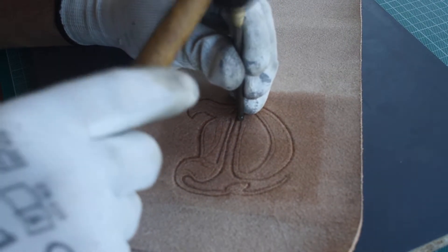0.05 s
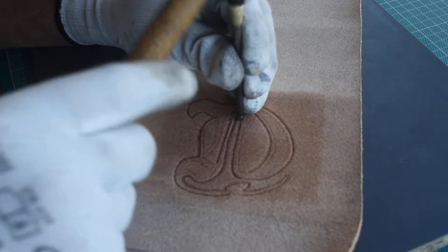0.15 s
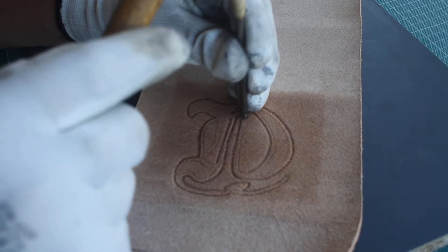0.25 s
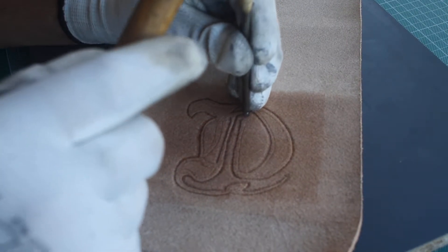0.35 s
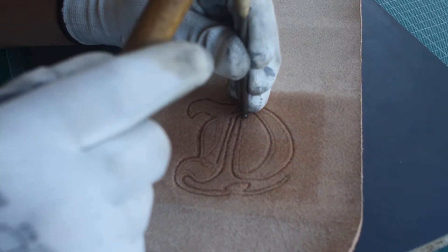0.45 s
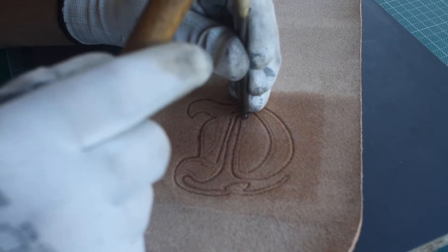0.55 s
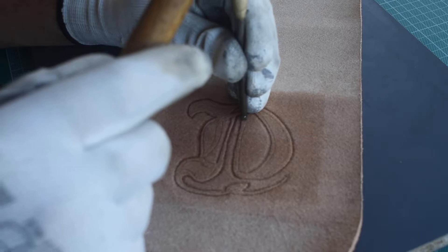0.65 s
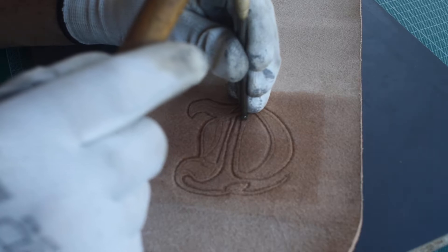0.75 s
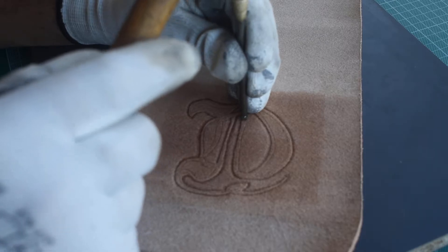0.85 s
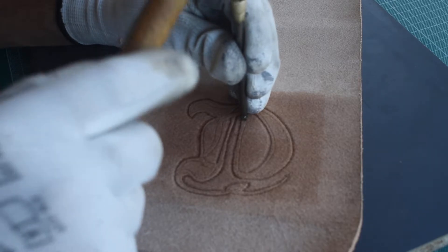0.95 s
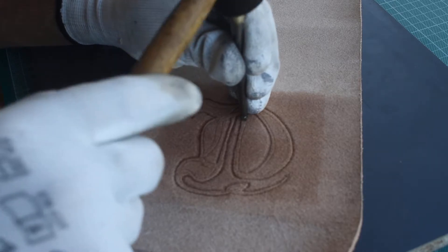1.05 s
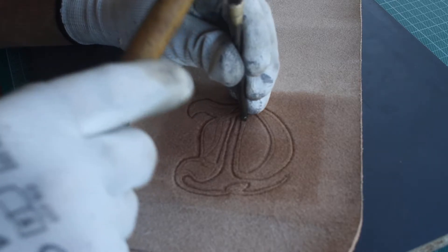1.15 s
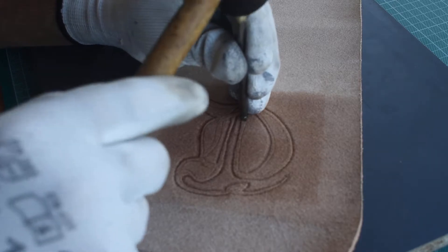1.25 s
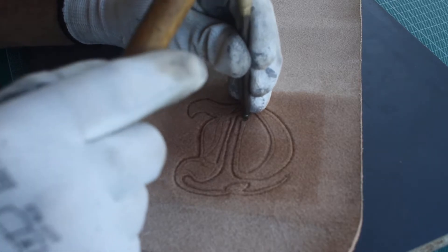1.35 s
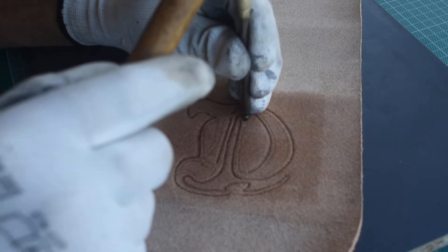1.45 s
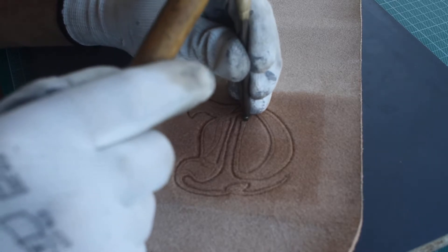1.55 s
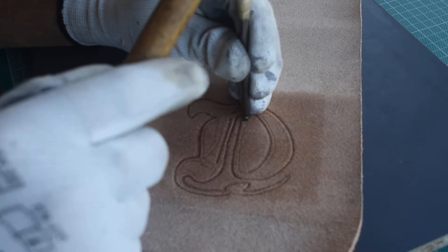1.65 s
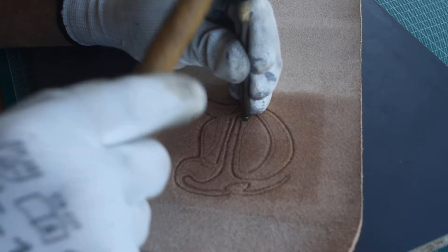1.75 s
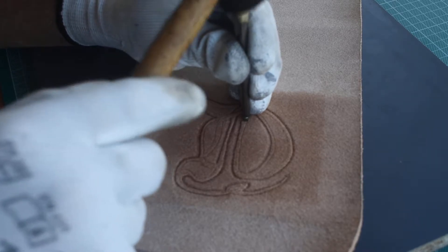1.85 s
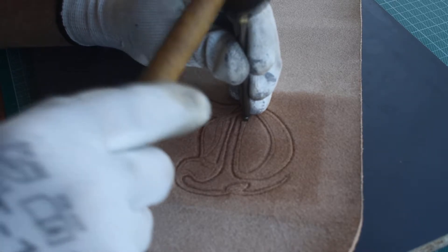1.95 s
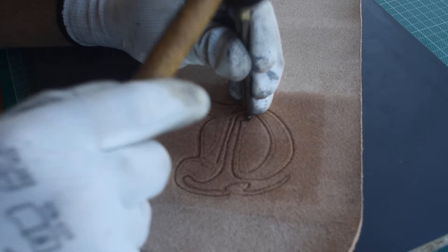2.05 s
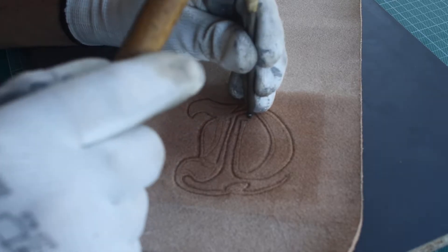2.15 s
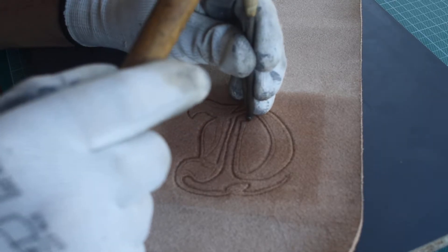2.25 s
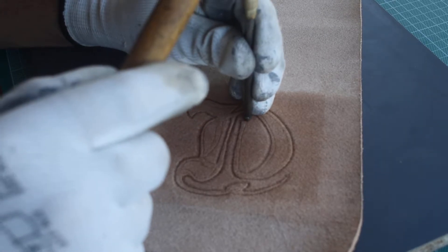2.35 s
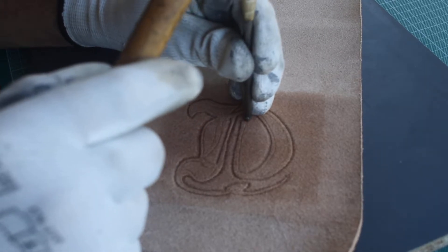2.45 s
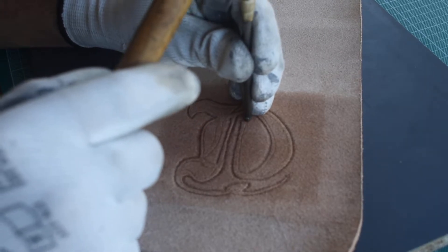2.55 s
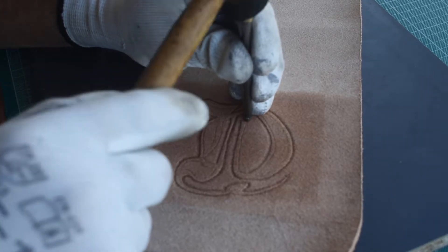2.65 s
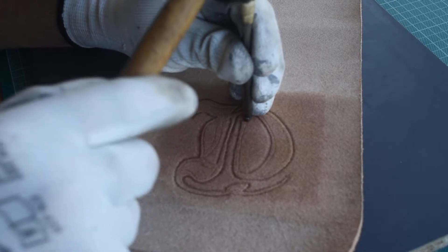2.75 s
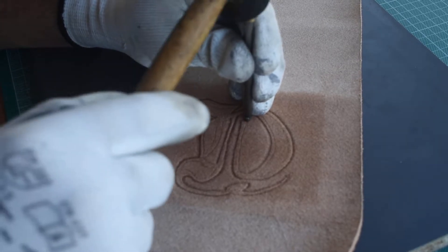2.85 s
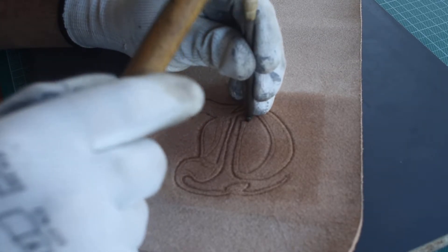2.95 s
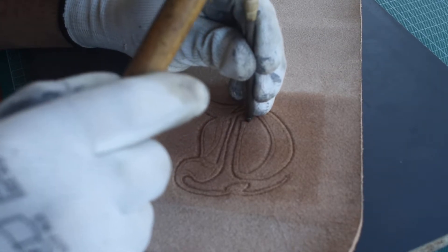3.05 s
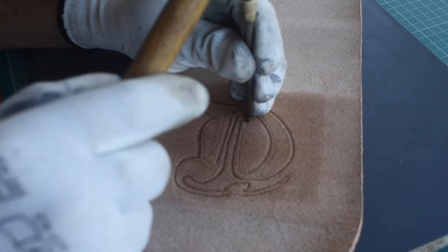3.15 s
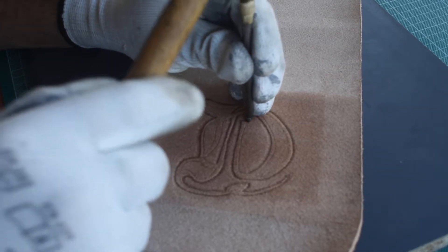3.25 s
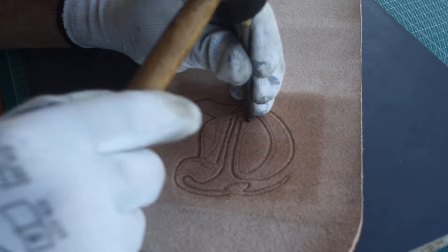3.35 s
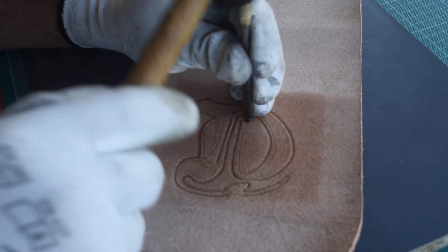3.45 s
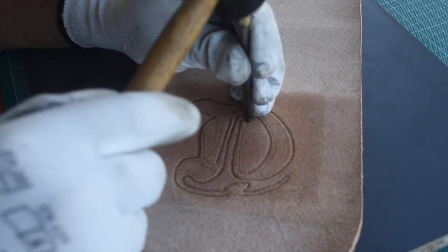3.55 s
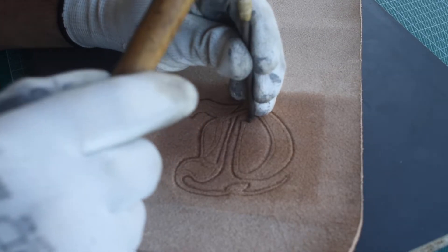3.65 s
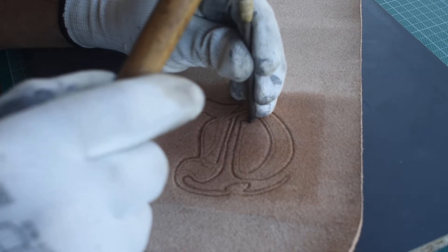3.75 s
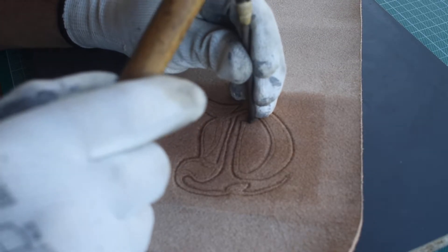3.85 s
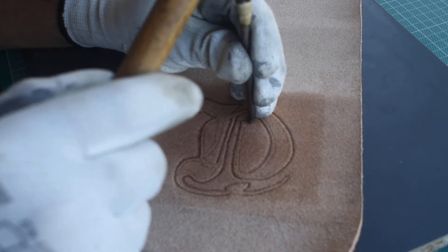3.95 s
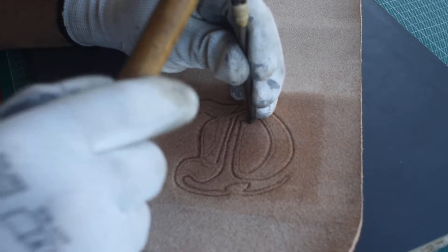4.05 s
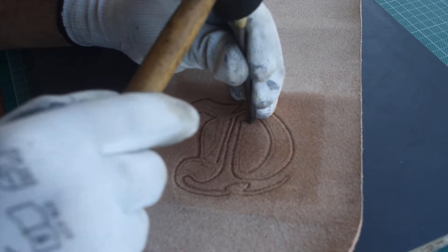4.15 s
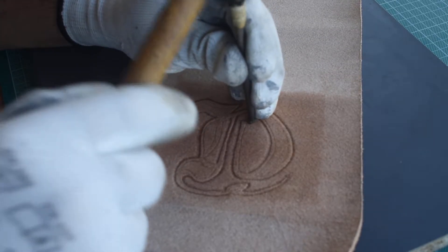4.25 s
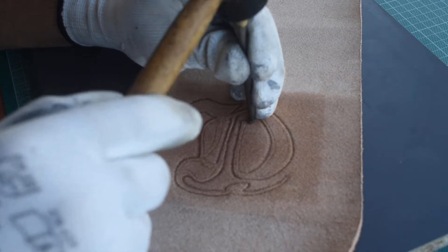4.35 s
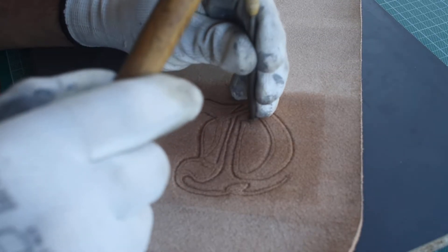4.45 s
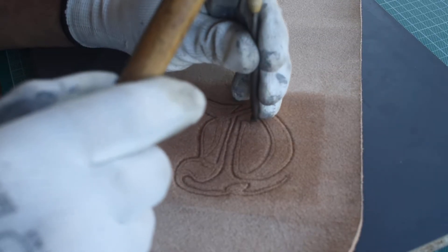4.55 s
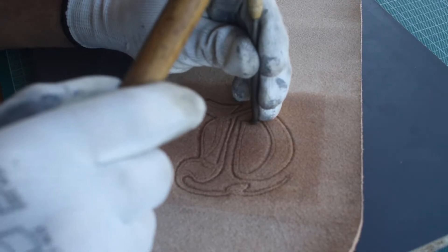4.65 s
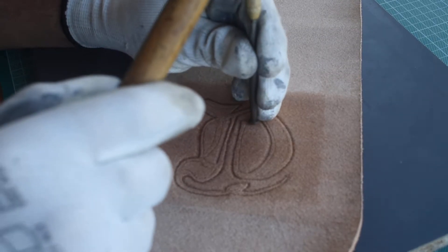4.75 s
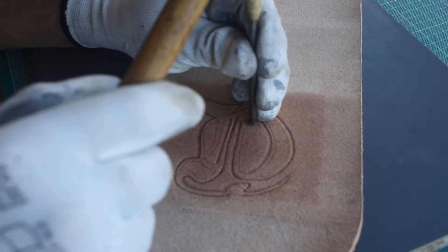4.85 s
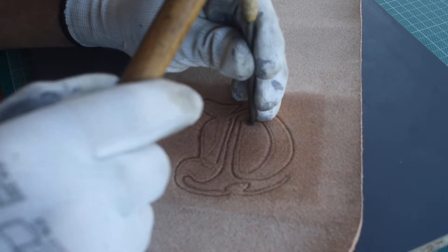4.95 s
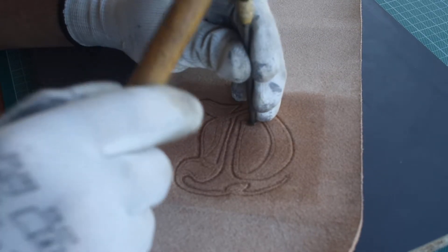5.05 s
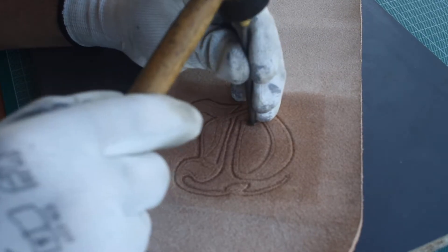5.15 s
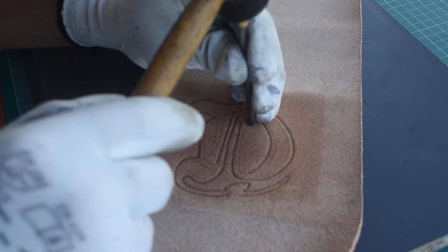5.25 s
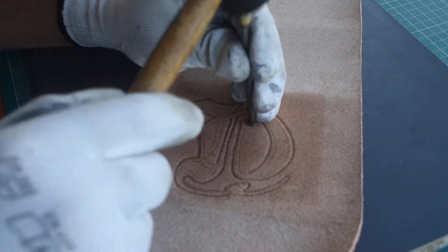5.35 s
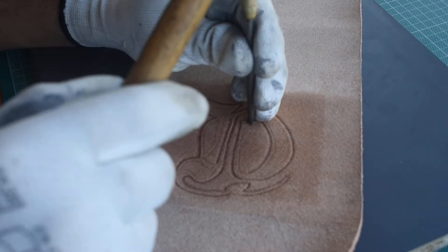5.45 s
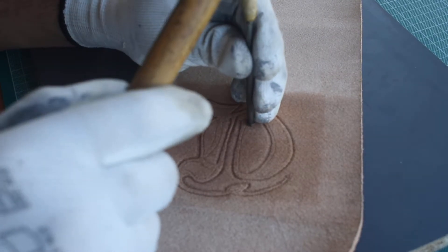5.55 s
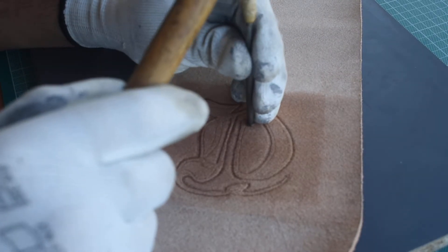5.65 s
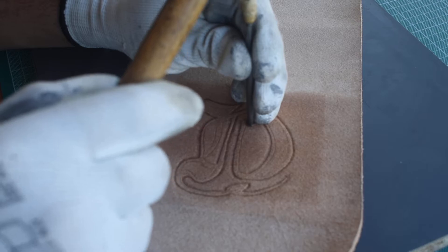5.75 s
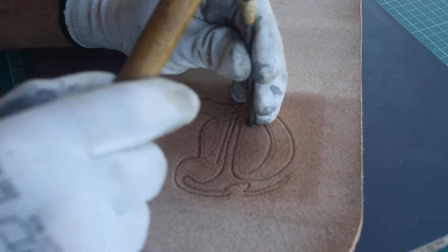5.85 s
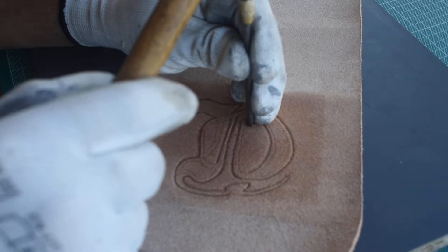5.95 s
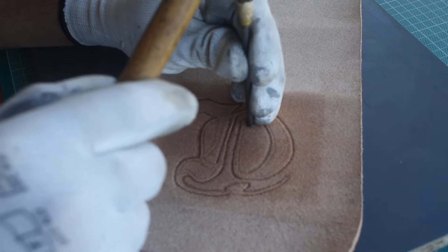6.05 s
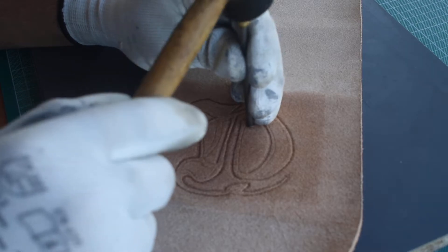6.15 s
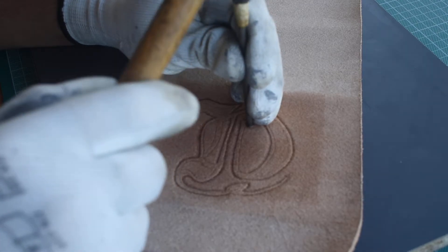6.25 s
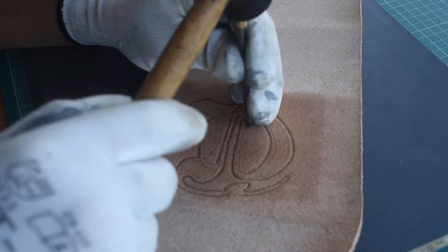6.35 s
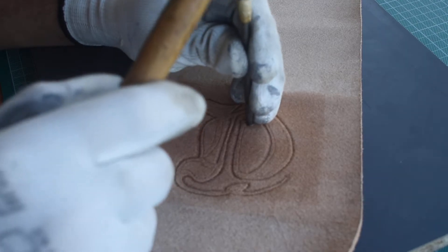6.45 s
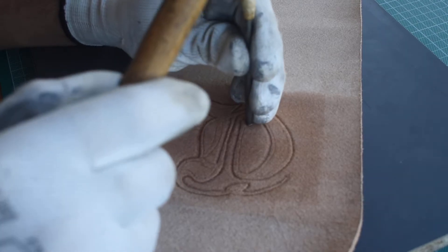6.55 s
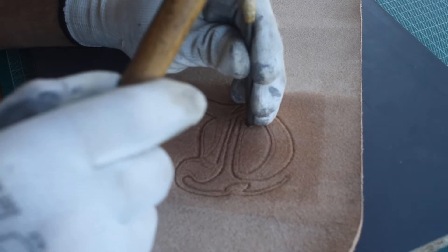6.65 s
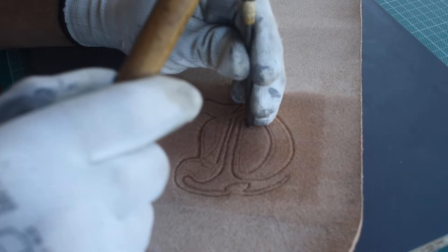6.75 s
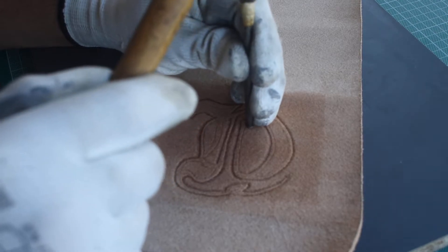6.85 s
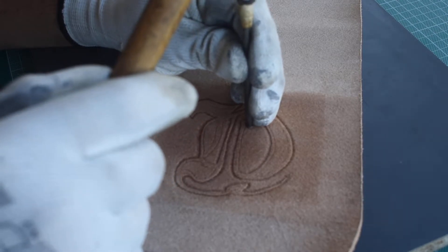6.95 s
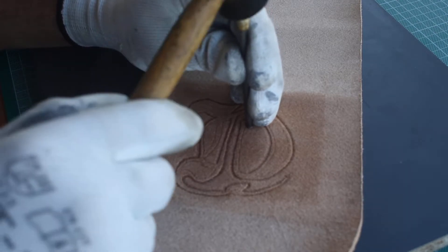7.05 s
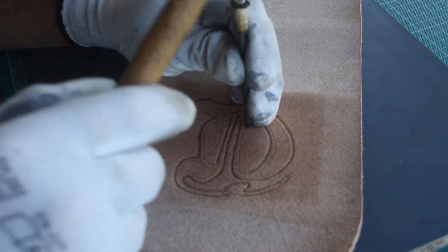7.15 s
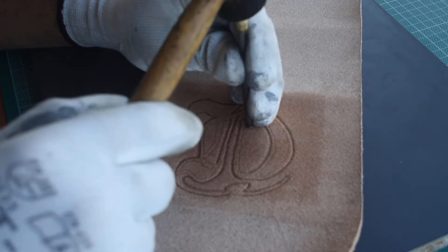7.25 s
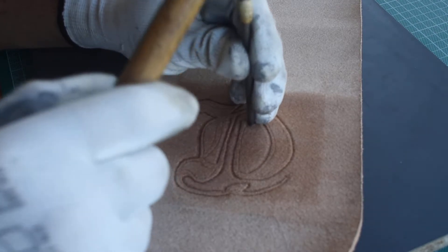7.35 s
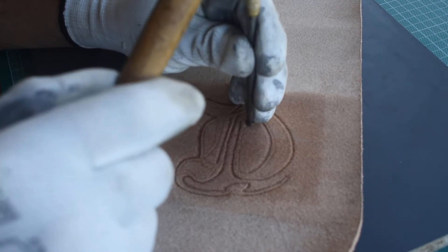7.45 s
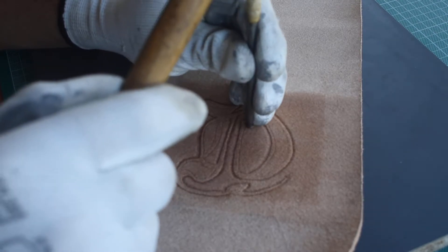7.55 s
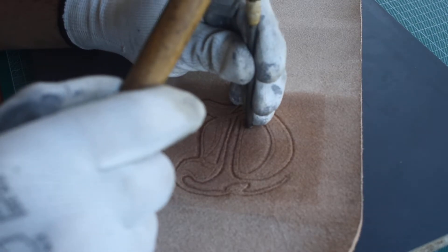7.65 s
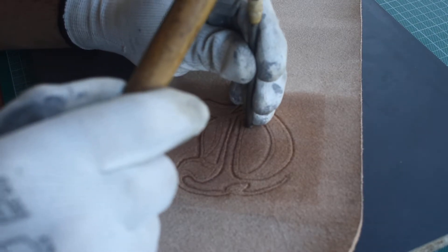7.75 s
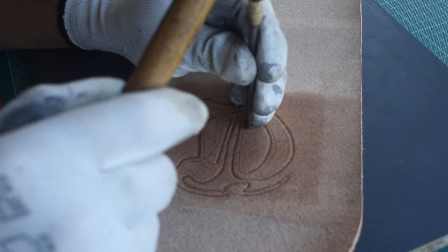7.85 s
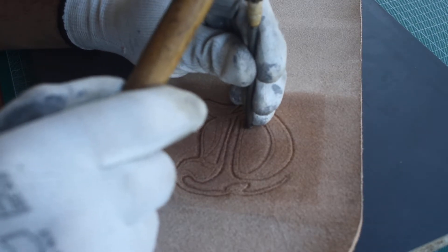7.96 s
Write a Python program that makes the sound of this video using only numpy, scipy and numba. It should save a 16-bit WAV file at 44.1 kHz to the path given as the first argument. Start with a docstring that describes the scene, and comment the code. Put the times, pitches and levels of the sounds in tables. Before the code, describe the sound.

In a small workroom, a mallet taps a hand-held steel stamp into damp leather on a bench, very close to a camera microphone. A single knock lands at 0.1 s, then pairs about 0.2 s apart begin near 1.0, 1.8, 2.65, 3.3, 4.1, 5.1, 6.1 and 7.1 s. Each is a dry, hard mid-pitched clack with a bright metallic tick and tiny rattle at its front, followed by close wall echoes and a short hollow ring of room and furniture; the first of the 6.1 s pair is softer. The level dips briefly after each blow. Between them, faint sparrows outside give short, buzzy falling chirps throughout, over quiet distant traffic and soft hiss, the traffic swelling slightly after 5 s. A very faint, thin high bird whistle wavers around 6.4-6.8 s, and a soft low bump comes at 7.9 s.

```python
"""A mallet taps a steel stamp into damp leather on a bench, in quick pairs, close to a camera microphone.
Each blow is a short force pulse exciting decaying modes of slab and bench, led by a steel tick and rattle.
A small room answers with echoes, a noise tail and slow resonances; distant traffic and hiss are shaped noise.
Sparrows chirp outside as warbled falling tones; a thin bird whistle and a soft low bump come late.
The camera's gain control ducks just after loud peaks, and peaks beyond full scale clip."""
import sys
import numpy as np
from scipy import signal
from scipy.fft import rfft, irfft
from scipy.io import wavfile
from scipy.ndimage import uniform_filter1d
from numba import njit

SR = 44100
rng = np.random.default_rng(int(sys.argv[2]) if len(sys.argv) > 2 else 0)


def boost_factor(decibels):
    """Convert a level in decibels to a linear amplitude factor."""
    exponent = np.asarray(decibels, float) / 20
    return 10 ** exponent


def generate_wav(sig):
    """Save sig (samples, or channels by samples) to the path in sys.argv[1] as 16-bit PCM at SR."""
    pcm = np.round(np.clip(np.atleast_2d(sig).T, -1, 1) * 32767).astype(np.int16)
    wavfile.write(sys.argv[1], SR, pcm)


N = 352800  # samples


def ring(modes, seconds, phase=0):
    """Modal synthesis: a struck body sounds as a sum of exponentially decaying cosines."""
    t = np.arange(int(seconds * SR)) / SR
    hz, db, t60 = np.transpose(modes)[:, :, None]
    decay = np.exp(-np.log(1000) * t / t60)
    return (boost_factor(db) * decay * np.cos(2 * np.pi * hz * t + phase)).sum(0)


def colour(x, points):
    """Linear filtering: multiply the spectrum by a gain drawn through (Hz, dB) points on a log axis."""
    hz, db = np.transpose(points)
    f = np.maximum(np.fft.rfftfreq(len(x), 1 / SR), 1)
    return irfft(rfft(x) * boost_factor(np.interp(np.log(f), np.log(hz), db)), len(x))


def unit(x):
    """Power normalization: scale to rms 1."""
    return x / np.sqrt(np.mean(x ** 2))


def add(out, x, s):
    """Superposition: mix x into out at time s in seconds."""
    i = int(s * SR)
    out[i:i + len(x)] += x[:N - i]


def tail(bands, rise_s, seconds=.6):
    """Diffuse reverberation: each noise band decays at its own rate, under one common quick rise."""
    t = np.arange(int(seconds * SR)) / SR
    out = 0
    for hz, db, t60 in bands:
        skirts = [(hz / 2.2, -40), (hz / 1.4, 0), (hz * 1.4, 0), (hz * 2.2, -40)]
        band = unit(colour(rng.standard_normal(len(t)), skirts))
        out = out + boost_factor(db) * band * np.exp(-np.log(1000) * t / t60)
    return out * (1 - np.exp(-(t / rise_s) ** 2)) / np.sqrt(len(bands))


# Traffic level over time. Each row: time in seconds, level in dB.
TRAFFIC_LEVEL = [(0, -55), (.5, -57.5), (1.5, -57), (2.4, -57.5), (3.2, -57), (3.9, -57.5), (4.6, -56.5),
                 (5.6, -54.5), (6.6, -55.5), (7.5, -54.5), (8, -53)]
# Traffic spectrum. Each row: frequency in Hz, relative density in dB per Hz.
ROAD_SPECTRUM = [(12, -40), (20, -5), (27, -7.5), (173, -1), (416, -4), (480, -4), (736, -6), (1020, -4.5),
                 (1440, -8), (1770, -8.5), (2600, -12), (3380, -52), (5720, -120)]
# Spectrum of a far flock and microphone hiss. Each row: frequency in Hz, relative density in dB per Hz.
HISS_SPECTRUM = [(1530, -28), (2600, -18), (2770, 0), (3770, 1.5), (4720, -2), (5090, -4), (6420, -7.5),
                 (14800, -20.5), (16000, -15), (16500, -44.5)]
HISS_DB = -62


def outdoors():
    """Stationary and modulated noise: low and middle traffic noise swells beneath a steady hiss."""
    swell = boost_factor(np.interp(np.arange(N) / SR, *np.transpose(TRAFFIC_LEVEL)))
    road = unit(colour(rng.standard_normal(N), ROAD_SPECTRUM))
    hiss = unit(colour(rng.standard_normal(N), HISS_SPECTRUM))
    return road * swell + hiss * boost_factor(HISS_DB)


# Mallet blows. Each row: time in seconds, knock in relative dB, tick in relative dB, contact in ms,
# low hum in relative dB.
BLOWS = [(0.0984, 1, -13, 0.98, -1), (1.0183, 0.9, -9.5, 0.89, 2), (1.201, 1.8, -12, 0.9, 3),
         (1.7868, 0.5, -11, 0.84, 1.7), (1.9759, 3, -8.5, 0.83, 1), (2.6545, 2, -10.5, 0.78, -2.2),
         (2.8436, 1.1, -12.5, 0.8, 0.5), (3.3082, 1.6, -9, 0.77, 6), (3.4917, 2.1, -12.5, 0.81, 4.5),
         (4.1136, 1.7, -8, 0.84, -1.5), (4.2986, 3.5, -11.5, 0.79, 0.7), (5.1045, 1, -10, 0.89, 3.5),
         (5.2744, 1.9, -11.5, 0.84, -1.5), (6.1356, -2, -12.5, 0.83, -0.5), (6.328, 2.05, -12, 0.93, -1),
         (7.0679, 2.5, -11.5, 0.79, 1), (7.2495, 3, -11.5, 0.83, 3.5)]
# Modes of slab and bench under the leather. Each row: frequency in Hz, relative level in dB, t60 in seconds.
SLAB_MODES = [(397, -17.5, 0.026), (559, -6, 0.012), (862, -5, 0.018), (1425, 2.5, 0.011),
              (2054, -4, 0.012), (2980, -66, .01)]
# Typical modes of the hand-held steel stamp. Each row: frequency in Hz, relative level in dB, t60 in seconds.
STAMP_MODES = [(3100, -10.5, 0.0051), (4000, -36, 0.18), (4400, -16.5, 0.0011), (5170, -15.5, 0.0029),
               (7180, 7.5, 0.0033), (8360, 2, 0.007)]
# Spectrum of the stamp's rattle. Each row: frequency in Hz, relative level in dB.
RATTLE_SPECTRUM = [(1500, -21), (2600, 4), (5000, 1), (7500, -18.5), (10000, -15.5), (16000, -40)]
RATTLE_DB, RATTLE_T60_S = -16.5, 0.019  # level relative to the tick setting
SLAB_TO_ROOM_DB, CLICK_TO_ROOM_DB = 25.5, 13.5
PAIR_GAP_S = .3  # a blow this soon after another is the second of a pair
FIRST_UPPER_DB, SECOND_UPPER_DB = 3, 1.4  # slab modes above 1800 Hz: the second blow is duller


def mallet():
    """Impact excitation: steel ticks and rattles lead, then a contact pulse drives all slab modes together."""
    knocks, ticks, pushes, shoves = np.zeros((4, N))
    chance = rng.standard_normal((len(BLOWS), len(STAMP_MODES) + len(SLAB_MODES)))
    rattles = rng.standard_normal((len(BLOWS), 2048))
    fade = np.exp(-np.log(1000) * np.arange(rattles.shape[1]) / SR / RATTLE_T60_S)
    second = np.diff(np.array(BLOWS)[:, 0], prepend=-1) < PAIR_GAP_S
    for (s, knock_db, tick_db, ms, hum_db), late, c, rattle in zip(BLOWS, second, chance, rattles):
        upper_db = SECOND_UPPER_DB if late else FIRST_UPPER_DB
        pulse = np.hanning(int(ms * SR / 1000) + 2) ** 1.543  # bell-shaped contact force
        pulse /= pulse.sum()
        push = pulse * boost_factor(knock_db)
        shove = pulse * boost_factor(hum_db)
        # every blow lands a little differently
        slab = [(hz, db + .3 * d + upper_db * (hz > 1800), t60)
                for (hz, db, t60), d in zip(SLAB_MODES, c[len(STAMP_MODES):])]
        stamp = [(hz * (1 + .03 * d), db + 2 * d, t60) for (hz, db, t60), d in zip(STAMP_MODES, c)]
        start = s - ms / 2000  # the pulse is centred on the blow
        add(knocks, np.convolve(push, ring(slab, .06)), start)
        tick = -boost_factor(tick_db - 22.5) * np.convolve(np.hanning(8), ring(stamp, .12))
        add(ticks, tick, s - .00075)
        rattle = unit(colour(rattle, RATTLE_SPECTRUM)) * fade
        add(ticks, boost_factor(tick_db + RATTLE_DB) * rattle, s - .0006)
        add(pushes, boost_factor(SLAB_TO_ROOM_DB) * push, start)
        click = boost_factor(np.array([tick_db + CLICK_TO_ROOM_DB]))  # the room hears the tick as a plain click
        add(pushes, click, start)
        add(shoves, shove, start)
    return knocks, ticks, pushes, shoves


# Room and furniture resonances that build up after a blow. Each row: frequency in Hz, relative level in dB,
# t60 in seconds.
RESONANCES = [(84.4, -27, 0.58), (179.9, -13.5, 0.26), (200.5, -6.5, 0.19), (297.9, 1, 0.24),
              (305.4, 8.5, 0.18), (349.6, -8.5, 0.31), (400, -10, 0.21), (406, 0.5, 0.25),
              (427.4, 2.5, 0.17), (482, -2, 0.14), (512.7, -6, 0.24), (561, -17, 0.15), (579.4, -1.5, 0.17),
              (664, -8.5, 0.27), (682.7, -11.5, 0.37), (733, -10, 0.22), (787, -10, 0.19), (900, -27, 0.13),
              (895, -6, 0.21), (918, -4, 0.24), (981, 27.5, 0.073), (1036, -19, 0.31), (1050, -23, 0.071),
              (1174, -2, 0.19), (1227, 1, 0.15), (1296.1, -5, 0.23), (1370, -1.5, 0.21), (1430, -27, 0.14)]
# Wall echoes. Each row: delay in seconds, level in dB, sign without unit.
ECHOES = [(.0151, -10, -1), (0.021, -17, -1), (0.0256, -24.5, 1), (.0335, -25.5, 1)]
# Diffuse tail. Each row: band centre in Hz, relative level in dB, t60 in seconds.
TAIL_BANDS = [(153, -54, 0.17), (278, -49, 0.21), (660, -41, 0.27), (1116, -37.5, 0.24), (1960, -34, 0.18),
              (3000, -34.5, 0.24), (4500, -36.5, 0.2), (6600, -44, 0.13), (10000, -66, .12),
              (15000, -67, .08)]
TAIL_RISE_S = 0.0038
RESONANCE_DB = -23
HUM_TOP_HZ = 325  # below, each blow's hum level drives the resonances; above, its knock and tick
HUM_RISE_S, BODY_RISE_S = 0.036, 0.026  # the upper resonances build faster


def room(knocks, pushes, shoves):
    """Convolution with impulse responses: wall echoes, a diffuse tail, slow modes of room and furniture."""
    diffuse = tail(TAIL_BANDS, TAIL_RISE_S)
    echoes = np.zeros(SR // 20)
    for s, db, sign in ECHOES:
        echoes[int(s * SR)] = np.sign(sign) * boost_factor(db)
    # walls return mostly the middle range
    dull = colour(knocks, [(500, -7.5), (900, 3.5), (1300, 1), (2500, -14.0)])
    low = [mode for mode in RESONANCES if mode[0] < HUM_TOP_HZ]
    high = [mode for mode in RESONANCES if mode[0] >= HUM_TOP_HZ]
    # neighbours start in opposite directions, close pairs beat
    hum = ring(low, .6, np.pi * (np.arange(len(low))[:, None] + .5))
    body = ring(high, .6, np.pi * (np.arange(len(high))[:, None] + .5 + len(low)))
    t = np.arange(len(hum)) / SR
    hum = hum * boost_factor(RESONANCE_DB) * (1 - np.exp(-(t / HUM_RISE_S) ** 2))
    # pushes already carry the slab-to-room gain
    body = body * boost_factor(RESONANCE_DB - SLAB_TO_ROOM_DB) * (1 - np.exp(-(t / BODY_RISE_S) ** 2))
    paths = [(pushes, diffuse + body), (dull, echoes), (shoves, hum)]
    return sum(signal.oaconvolve(source, response)[:N] for source, response in paths)


# Sparrow notes. Each row: start in seconds, length in seconds, first pitch in Hz, last pitch in Hz,
# relative level in dB.
CHIRPS = [(.184, 0.039, 5370, 5270, -55.5), (0.219, 0.053, 4400, 3740, -63), (.282, 0.1, 4000, 3800, -61.5),
          (0.284, 0.12, 5880, 5453, -63.5), (0.318, .11, 4590, 4120, -54.5),
          (0.349, 0.14, 3245, 2875, -59.5), (.61, 0.12, 5260, 3175, -58), (1.091, .13, 4860, 4170, -56.5),
          (1.106, 0.16, 3960, 3195, -58.5), (1.205, .057, 5100, 4880, -55), (1.256, 0.075, 6600, 6400, -67),
          (1.266, 0.075, 4970, 4640, -58), (1.294, 0.11, 4200, 3100, -56), (1.568, 0.11, 5260, 3254, -56),
          (2.025, 0.062, 4500, 4095, -52.5), (2.036, .14, 3520, 2830, -58), (2.202, 0.057, 4640, 4680, -66),
          (2.27, 0.075, 5290, 4830, -63), (2.309, .076, 4260, 3800, -61.5), (2.715, .12, 4360, 2960, -57.5),
          (2.72, .08, 5700, 5370, -65), (3.005, 0.096, 5425, 3350, -53.5), (3.927, 0.19, 4850, 3970, -58),
          (3.965, 0.13, 3900, 3210, -54.5), (4.735, 0.15, 5990, 3200, -53.5),
          (4.967, 0.045, 5830, 5570, -60.5), (5.013, 0.086, 5100, 4400, -58),
          (5.02, 0.076, 3390, 2950, -58), (5.94, .145, 5720, 3030, -57), (6.061, 0.17, 4600, 3800, -62),
          (6.35, 0.095, 4000, 3000, -55.5), (6.57, 0.071, 4000, 3690, -61),
          (6.791, 0.23, 5800, 5540, -64.5), (6.82, 0.19, 4320, 3885, -58.5), (6.86, .2, 3210, 3100, -60),
          (7.46, 0.16, 4500, 4300, -56.5), (7.482, .19, 3500, 3000, -58.5), (7.9, .1, 4900, 3100, -55)]
# warble rate: a floor plus a share of the last pitch, capped
WARBLE_FLOOR_HZ, WARBLE_SHARE, WARBLE_MAX_HZ = 39.4, .095, 443
FLAT_DEPTH_RAD, DEPTH_LOSS_RAD_PER_OCT = 1.01, 0.45  # level notes buzz more than steep falls
FALL_POWER, PEAK_SKEW, EDGE_POWER = 2.7, 0.81, 0.5  # bend of the fall; early peak; softness of both ends
RASP_RAD, PATCHY_DB = 0.77, 4  # rms hoarseness; rms unevenness within a note


def sparrows():
    """Phase modulation: a fast warble spreads gliding tones into stacks of lines, and walls reflect them."""
    out = np.zeros(N)
    rasp = RASP_RAD * unit(uniform_filter1d(rng.standard_normal(N), size=60))
    for s, length, first_hz, last_hz, db in CHIRPS:
        u = np.linspace(0, 1, int(length * SR))  # progress through the note
        hz = last_hz + (first_hz - last_hz) * (1 - u) ** FALL_POWER
        warble_hz = min(WARBLE_FLOOR_HZ + WARBLE_SHARE * last_hz, WARBLE_MAX_HZ)
        depth = FLAT_DEPTH_RAD - DEPTH_LOSS_RAD_PER_OCT * np.log2(first_hz / last_hz)
        phase = 2 * np.pi * np.cumsum(hz) / SR
        phase += depth * np.sin(2 * np.pi * warble_hz * length * u)
        i = int(s * SR)
        phase += rasp[i:][np.minimum(np.arange(len(u)), N - i - 1)]
        voice = np.sin(phase) + .025 * np.sin(2 * phase)
        envelope = np.abs(np.sin(np.pi * u ** PEAK_SKEW)) ** EDGE_POWER
        add(out, boost_factor(db) * envelope * voice, s)
    out *= boost_factor(PATCHY_DB * unit(uniform_filter1d(rng.standard_normal(N), size=500)))
    yard = tail([(3000, -26.5, 0.19), (5400, -27.5, 0.19), (3800, -36.0, 0.79)], 0.0032)
    yard[0] = 1.0  # direct sound
    return signal.fftconvolve(out, yard)[:N]


def whistle():
    """Frequency modulation: another bird's thin high tone wavers slowly in pitch."""
    t = np.arange(int(.4 * SR)) / SR
    hz = 6100 - 70 * np.sin(2 * np.pi * t / .21)  # 70 Hz swing, .21 s period
    tone = np.sin(2 * np.pi * np.cumsum(hz) / SR)
    out = np.zeros(N)
    add(out, boost_factor(-72) * signal.windows.tukey(len(t), .2) * tone, 6.41)
    return out


# A soft low bump. The row: start in seconds, frequency in Hz, level in dB, t60 in seconds.
THUD = (7.884, 85, -39, .05)


def thud():
    """Damped oscillation: one low mode starts from zero displacement and dies away."""
    s, hz, db, t60 = THUD
    out = np.zeros(N)
    add(out, ring([(hz, db, t60)], .1, -np.pi / 2), s)
    return out


def scene():
    """Linear superposition of background, blows, room, birds and bump."""
    background = outdoors()
    knocks, ticks, pushes, shoves = mallet()
    blows = knocks + ticks + room(knocks, pushes, shoves)
    out = background + blows + sparrows() + whistle() + thud()
    return out[None]


@njit
def follow(x, attack, release):
    """Envelope detection: one-pole smoothing, quick up and slow down."""
    e, out = 0., np.empty(len(x))
    for i in range(len(x)):
        e += (x[i] - e) * (attack if x[i] > e else release)
        out[i] = e
    return out


def band_limit(x):
    """A steep low-pass at the top of the band."""
    return signal.sosfilt(signal.butter(12, 16830, fs=SR, output="sos"), x)


# Treble roll-off. Each row: frequency in Hz, gain in dB.
TREBLE_ROLL_OFF = [(9000, 0), (12000, -1.5), (16000, -3)]


def record(dry):
    """Dynamic range compression: gain ducks just after loud peaks and recovers; then clipping, softer treble."""
    level = follow(np.abs(dry[0]), 1 / (0.0016 * SR), 1 / (0.055 * SR))  # time constants in s
    gain = uniform_filter1d((1 + level / boost_factor(-29)) ** -.35, size=128)
    t = np.arange(N) / SR
    late_gain = np.interp(t - .004, t, gain)  # the control acts 4 ms late
    clipped = np.clip(dry * late_gain, -1, 1)
    mix = colour(clipped[0], TREBLE_ROLL_OFF)[None]
    return band_limit(mix)


dry = scene()
out = record(dry)
generate_wav(out)
```